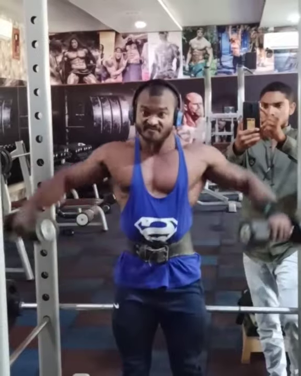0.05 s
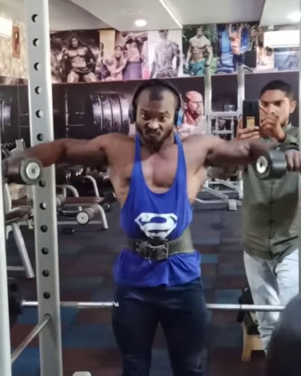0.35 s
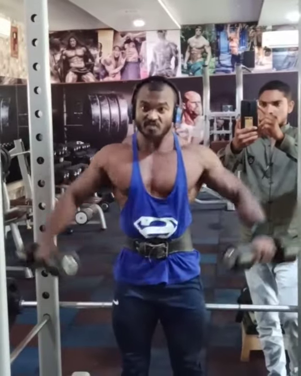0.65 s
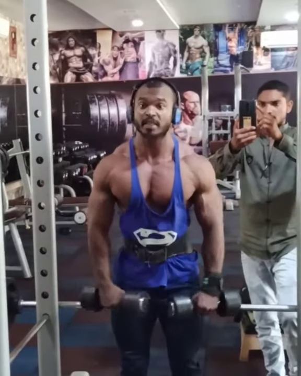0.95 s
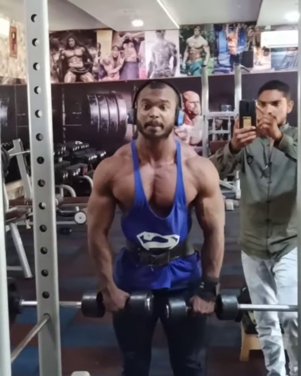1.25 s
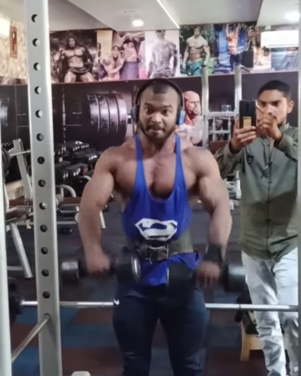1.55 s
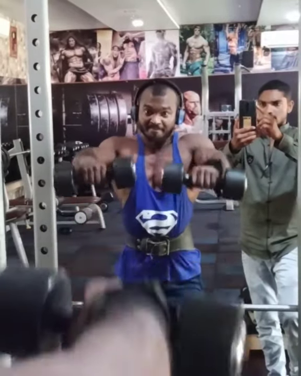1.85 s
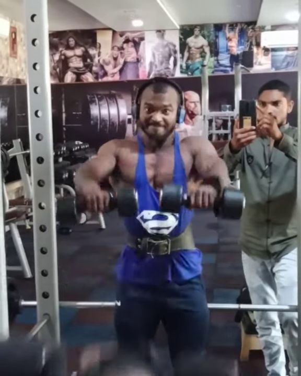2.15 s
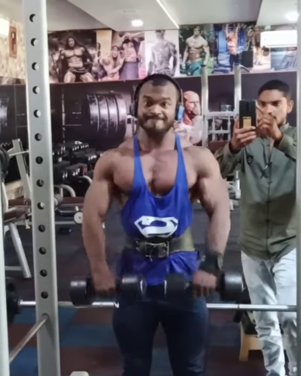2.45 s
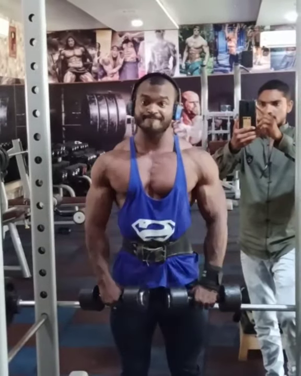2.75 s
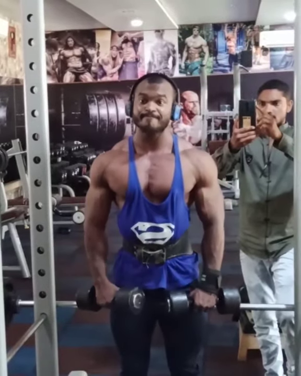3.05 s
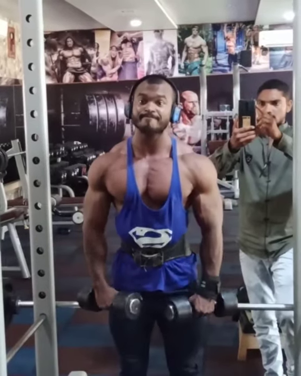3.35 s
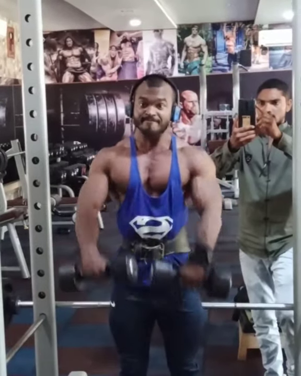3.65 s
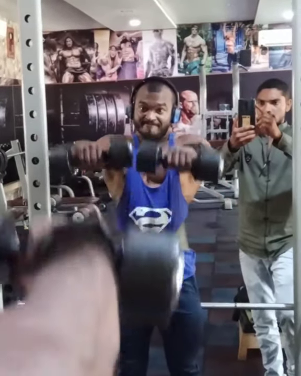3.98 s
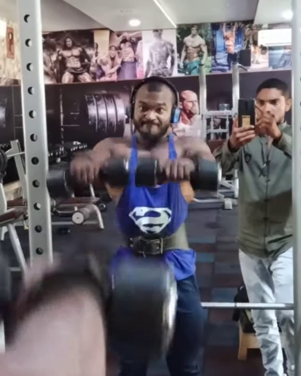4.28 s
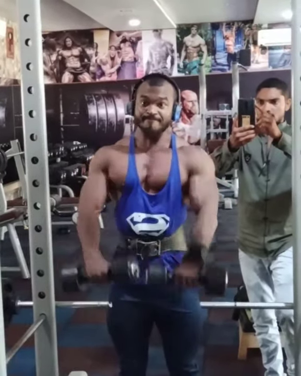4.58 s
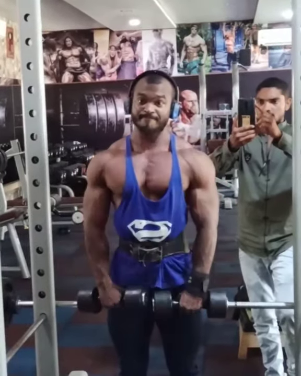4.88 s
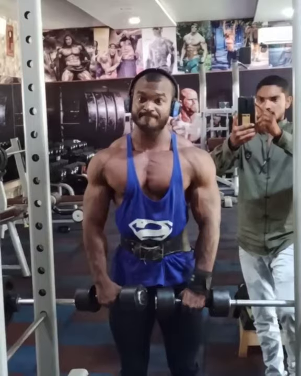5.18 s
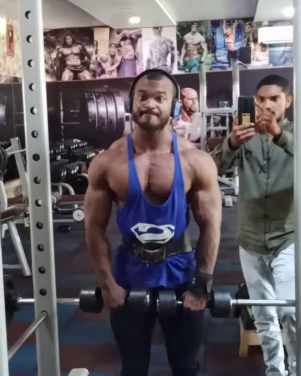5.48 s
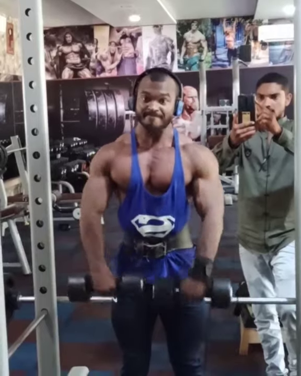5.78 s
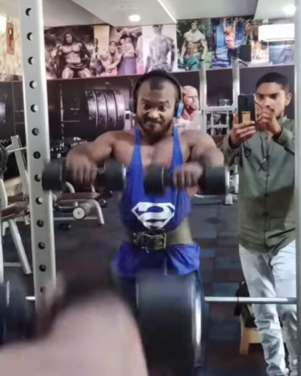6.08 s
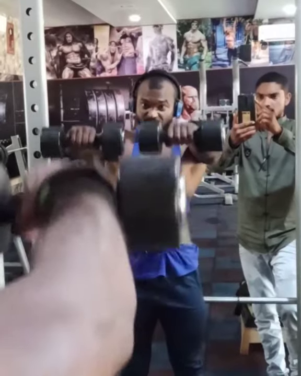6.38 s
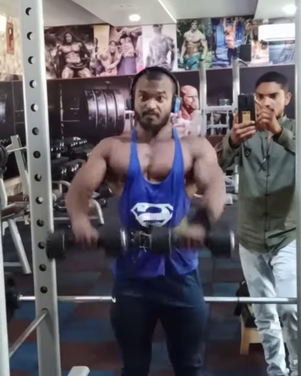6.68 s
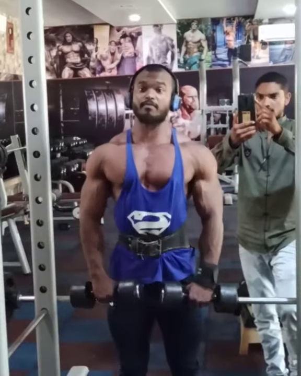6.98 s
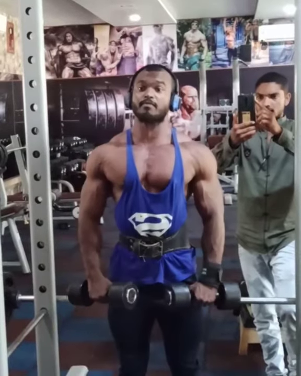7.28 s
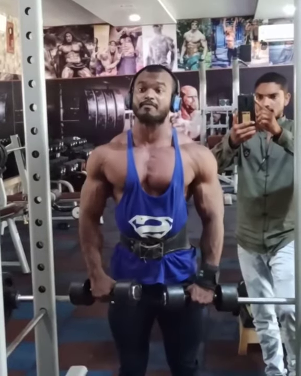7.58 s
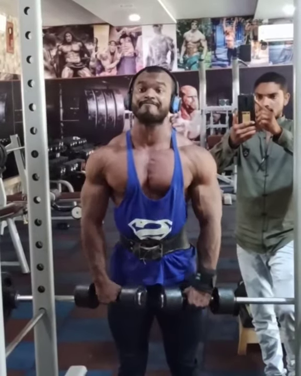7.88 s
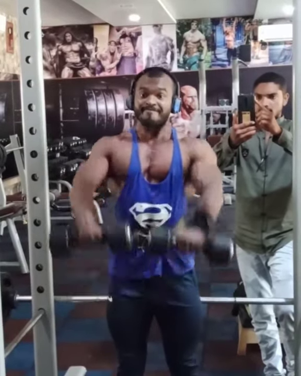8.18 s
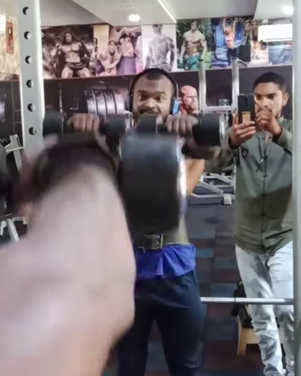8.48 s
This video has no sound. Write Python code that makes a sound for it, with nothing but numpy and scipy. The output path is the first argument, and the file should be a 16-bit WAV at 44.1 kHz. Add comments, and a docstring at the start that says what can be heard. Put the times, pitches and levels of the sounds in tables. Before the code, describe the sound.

Ventilation rushes steadily in a hard-walled gym. Iron dumbbells knock against a racked steel barbell, then again with a quick clatter of contacts. After a three-second pause come four more knocks, evenly spaced a little over a second apart. Each thumps, clunks and rings briefly, heard mostly through the room's long echo, and the bar hums faintly in between.

```python
"""Ventilation rushes steadily in a hard-walled gym. Almost at once, iron dumbbells knock against a
racked steel barbell, and again a good second later. After a three-second pause come four more knocks,
one for each repetition. Each is one or a few contacts that thump, clunk and briefly ring, heard mostly
through the room's long echo. After each knock the bar hums on softly at its lowest bending note."""
import sys
import numpy as np
from scipy import signal
from scipy.fft import rfft, irfft, next_fast_len
from scipy.io import wavfile
from scipy.ndimage import uniform_filter1d

SR = 44100
rng = np.random.default_rng(int(sys.argv[2]) if len(sys.argv) > 2 else 0)


def persist_wave(psi):
    """Save psi, clipped to +-1, as 16-bit WAV."""
    counts = np.round(np.clip(psi, -1, 1) * 32767).astype(np.int16)
    wavfile.write(sys.argv[1], SR, np.atleast_2d(counts).T)


N = 384993

# One knock per repetition. Each row: start in seconds, force in dB, hardness as treble tilt in dB per
# octave, then thump, clunk, bonk, clang, tick and the hum left in the bar, all in dB.
KNOCKS = [ (.321, -4, -1.06, 5, 7, -2, 2.5, -12, -42), (1.572, 1, -1.1, 5.5, 2, -2, 6, -5, -35),
          (4.628, 4.5, 0.2, 10, 5, -2, 1.5, 2, -46), (5.811, 9, -1.77, 6.5, 9.5, -8.5, 1, 7, -51),
          (7.060, 5.5, 0.45, 8, 13.5, 1.5, 2, 6.5, -53), (8.337, 7, 1.13, 13, 9.5, 3.5, 1.5, 3, -45)]
# The dumbbells seldom land together, so more contacts follow. Each row: start in seconds, force in dB.
FOLLOW_UPS = [(.332, 3), (1.585, 1.5), (1.638, 6.5), (1.665, 6.5), (4.650, 5), (7.073, 2)]
def contacts(follow_tick_db=-15):
    """A knock's first touch and its follow-ups share one colour."""
    for row, end in knocks_with_ends():
        start, force_db, tilt_db, thump_db, clunk_db, bonk_db, clang_db, tick_db, _ = row
        zing_db = 0.78 * clang_db - 1  # the zing rises with the clang
        boosts_db = thump_db, clunk_db, bonk_db, clang_db, zing_db
        yield start, force_db, tilt_db, boosts_db, tick_db
        for follow_start, follow_db in FOLLOW_UPS:
            if start < follow_start < end:
                yield follow_start, follow_db, tilt_db, boosts_db, follow_db + follow_tick_db


def knocks_with_ends():
    """Pairs each knock with the time of the next one, or with the end of the scene."""
    return zip(KNOCKS, [row[0] for row in KNOCKS[1:]] + [N / SR])


def dumbbell_knocks(level_db=13, ring_db=-4, tick_boost_db=4):
    """Each contact sends a blow, a ring and a tick round the room; only the tick also arrives directly."""
    mix, echoes = np.zeros((2, N)), wall_echoes()
    for start, force_db, tilt_db, boosts_db, tick_db in contacts():
        force = gain_of(level_db + force_db)
        tick = gain_of(tick_db + tick_boost_db) * metal_tick()
        sound = force * gain_of(ring_db) * bar_ring()
        add(sound, 0, force * blow(tilt_db, boosts_db))
        add(sound, 0, tick[0])
        in_room = signal.fftconvolve(sound[None], room_tail() + echoes, axes=1)
        for channel, echoed, direct in zip(mix, in_room, tick):
            add(channel, start, echoed)
            add(channel, start, direct)
    return mix


# The colour of iron meeting steel. Each row: frequency in Hz, relative level in dB.
IMPACT_COLOUR = [(30, 0), (60, -11), (90, 1), (120, 4), (240, 2.5), (450, 1.5), (620, 7), (780, 8),
                 (950, 9.5), (1250, 6), (1700, 4.5), (3300, -0.5), (4600, 0.5), (7500, -2), (13000, -13)]
# Broad resonances of bar, hooks and rack: thump, clunk, bonk, clang and zing.
# Each row: centre in Hz, width in Hz.
RESONANCES = [(178, 125), (400, 320), (950, 330), (2300, 680), (3900, 2800)]
def blow(tilt_db, boosts_db, size=4096):
    """A sharp contact stirs the broad resonances; the harder it is, the brighter it sounds."""
    hz = np.fft.rfftfreq(size, 1 / SR)
    octaves = np.log2(np.maximum(hz, 500) / 2000)
    humps_db = sum(db * hump(hz, centre, width) for db, (centre, width) in zip(boosts_db, RESONANCES))
    return shaped_click(read_curve(IMPACT_COLOUR, hz) + tilt_db * octaves + humps_db)


# The bar's brief notes. Each row: pitch in Hz, relative level in dB, seconds to fade by 60 dB.
BAR_NOTES = [(351, -17, .35), (418, -19, .3), (599, -18, .2), (1082, -21, .3), (1248, -21, .15),
             (1565, -24, .3), (1738, -25, .2), (2077, -23, .15), (2218, -23, .25), (2286, -19, .5),
             (2509, -26, .3), (2661, -23, .3), (3434, -28, .3), (3678, -26, .35), (4478, -24, .35),
             (6826, -25, .3), (7439, -24, .3)]
def bar_ring(spread_db=2):
    """The struck bar rings with many notes at once, in a slightly different blend each time."""
    weights = gain_of(spread_db * rng.standard_normal(len(BAR_NOTES)))
    weights *= rng.choice([-1, 1], len(BAR_NOTES))
    return sum(weight * gain_of(db) * fading_note(hz, fade_s)
               for weight, (hz, db, fade_s) in zip(weights, BAR_NOTES))


def fading_note(hz, fade_s):
    """Half a second of one struck note dying away, with energy 1."""
    t = np.arange(SR // 2) / SR
    wave = np.sin(2 * np.pi * hz * t) * np.exp(-np.log(1000) * t / fade_s)
    return wave / np.linalg.norm(wave)


def metal_tick(decay_s=.004, low_hz=10500, size=2048):
    """The thin, very high snap as metal first touches metal."""
    snap = rng.standard_normal((2, size)) * np.exp(-np.arange(size) / SR / decay_s)
    snap = signal.sosfilt(signal.butter(6, low_hz, "high", fs=SR, output="sos"), snap)
    return snap / np.linalg.norm(snap[0])


def bar_hum(pitch_hz=161.6, fade_db_per_s=4, settle_s=0.13):
    """Each knock starts or damps the bar's lowest bending note, which loses energy very slowly."""
    t, loudness = np.arange(N) / SR, np.zeros(N)
    for (start, *_, hum_db), end in knocks_with_ends():
        age = np.arange(0, end - start, 1 / SR)
        add(loudness, start, gain_of(hum_db - fade_db_per_s * age))
    step = 1 / (settle_s * SR)
    loudness = signal.lfilter([step], [1, -np.exp(-step)], loudness)  # glide to each new level
    return loudness * unit_level(np.sin(2 * np.pi * pitch_hz * t))


# How long the room rings. Each row: frequency in Hz, seconds to fade by 60 dB.
ROOM_FADE = [(60, 2.15), (150, 0.7), (400, 1.19), (1000, 1.39), (2200, 1.525), (4000, 1.5), (8000, 1.066),
             (12500, 0.6)]
def room_tail(build_s=0.022, rise_power=0.48, size=49152):
    """The gym equipment scatters sound into a wash that swells, then dies, new for every contact."""
    hz, frame_s, bands = signal.stft(diffuse_noise(size), SR, nperseg=256)
    decay = np.exp(-np.log(1000) * frame_s / read_curve(ROOM_FADE, hz)[:, None])
    _, wash = signal.istft(bands * decay, SR, nperseg=256)
    t = np.arange(size) / SR
    rise = (1 - np.exp(-t / build_s)) ** rise_power
    fade_out = np.minimum(10 * (1 - t / t[-1]), 1)
    return blend_paths(wash[:, :size]) * rise * fade_out


# The strength of the room's wash. Each row: frequency in Hz, level in dB.
WASH_COLOUR = [(100, 0.5), (200, -1.5), (400, 2.5), (700, 1.5)]
def blend_paths(wash, band_hz=50):
    """So many paths overlap in the room that nearby frequencies get almost the same energy."""
    spectrum, hz = rfft(wash), np.fft.rfftfreq(wash.shape[1], 1 / SR)
    power = uniform_filter1d((abs(spectrum) ** 2).mean(0), max(round(band_hz / hz[1]), 1))
    return irfft(spectrum * gain_of(read_curve(WASH_COLOUR, hz)) / np.sqrt(power + 1e-12))


# Single echoes from floor, mirror, ceiling and walls. Each row: delay in seconds, level in dB.
ECHOES = [(.002, -12), (.0085, -14.5), (.0195, -13), (.0285, -8), (.0445, -6), (.079, -11.5), (.18, -15)]
def wall_echoes(below_hz=450, size=49152):
    """Only the bass bends round the equipment and comes back as separate echoes."""
    bounces = np.zeros(size)
    for delay, db in ECHOES:
        add(bounces, delay, gain_of([db]))
    return signal.sosfilt(signal.butter(3, below_hz, fs=SR, output="sos"), bounces)


# The colour of the rushing air. Each row: frequency in Hz, relative level in dB.
AIR_COLOUR = [(20, -4), (45, -15), (80, -11.5), (130, -2.5), (200, -6), (350, 1.5), (600, -3.5), (860, -3),
              (1200, -8), (2400, -12.5), (4000, -18.5), (7500, -24), (13000, -29.5)]
# Faint fan tones in the air stream. Each row: pitch in Hz, width in Hz, boost in dB.
FAN_TONES = [(245, 23, 4.5), (472, 8.6, -0.5), (858, 9.1, 10.5), (947, 14, 6)]
def ventilation(level_db=-39, swell_db=-0.47):
    """Air rushes from all sides with a faint fan whine; its level wavers very slightly."""
    size = next_fast_len(N)
    hz, t = np.fft.rfftfreq(size, 1 / SR), np.arange(N) / SR
    fan_db = sum(db * hump(hz, centre, width) for centre, width, db in FAN_TONES)
    colour = gain_of(read_curve(AIR_COLOUR, hz) + fan_db)
    air = irfft(rfft(diffuse_noise(size)) * colour, size)[:, :N]
    swell = sum(np.sin(2 * np.pi * (rate_hz * t + rng.random())) for rate_hz in np.geomspace(.3, 6, 10))
    return gain_of(level_db + swell_db * unit_level(swell)) * unit_level(air)


def diffuse_noise(size, mic_gap_m=0.17):
    """Noise from all sides at two microphones: alike in the bass, unrelated in the treble."""
    left, other = rfft(rng.standard_normal((2, size)))
    likeness = np.sinc(2 * np.fft.rfftfreq(size, 1 / SR) * mic_gap_m / 343)  # sound travels 343 m/s
    right = likeness * left + np.sqrt(1 - likeness ** 2) * other
    return irfft(np.array([left, right]), size)


def gain_of(db):
    """Turns decibels into a multiplier."""
    return 10 ** (np.asarray(db) / 20)


def unit_level(x):
    """Scales a signal to an average (rms) level of 1."""
    return x / np.sqrt(np.mean(x ** 2) + 1e-20)


def read_curve(points, hz):
    """Reads between a table's rows, with octaves evenly spaced."""
    row_hz, value = np.transpose(points)
    return np.interp(np.log(hz + 1), np.log(row_hz + 1), value)


def hump(hz, centre, width):
    """The bell shape of a resonance: 1 at its centre, half at its edges."""
    return .5 ** np.minimum((2 * (hz - centre) / width) ** 2, 20)


def shaped_click(db):
    """The quickest click that has these levels from low to high frequency."""
    log_gain = np.log(gain_of(np.concatenate([db, db[-2:0:-1]])))
    return irfft(np.exp(np.conj(signal.hilbert(log_gain)))[:len(db)])


def add(mix, start_s, sound):
    """Adds a sound to the mix at its start time."""
    part = mix[round(start_s * SR):][:len(sound)]
    part += sound[:len(part)]


def scene():
    """Knocks in the room, the humming bar and the air."""
    return dumbbell_knocks() + bar_hum() + ventilation()


# The microphones' uneven treble. Each row: frequency in Hz, gain in dB.
MIC_COLOUR = [(4700, -1), (4880, -19), (5250, -9.5), (5950, -10.5), (6200, -2.5), (7600, 0), (7800, -3),
              (8400, -1.5), (8750, -36.5), (10000, -75), (11200, -58), (11700, -8.5), (12900, -19),
              (13500, -47)]
# How the two sides differ. Each row: frequency in Hz, left minus right in dB.
MIC_BALANCE = [(200, 0), (700, -.5), (1200, -2.5), (1800, -3.5), (2300, -5.5), (3000, -6.5), (3700, 1.5),
               (4600, -1.5), (6000, 5.5), (7400, 5.5), (8500, 2), (12000, -1)]
def record(dry, low_cut_hz=85, high_cut_hz=13600, size=4096):
    """Each microphone colours the sound and loses the deepest bass and the highest treble."""
    hz = np.fft.rfftfreq(size, 1 / SR)
    colour_db, side_db = read_curve(MIC_COLOUR, hz), read_curve(MIC_BALANCE, hz) / 2
    mics = np.array([shaped_click(colour_db + side_db), shaped_click(colour_db - side_db)])
    heard = signal.oaconvolve(dry, mics, axes=1)[:, :N]
    heard = signal.sosfilt(signal.butter(2, low_cut_hz, "high", fs=SR, output="sos"), heard)
    treble_cut = signal.firwin(511, high_cut_hz, window=("kaiser", 9), fs=SR)
    return signal.oaconvolve(heard, treble_cut[None], "same")


dry = scene()
out = record(dry)
persist_wave(out)
```